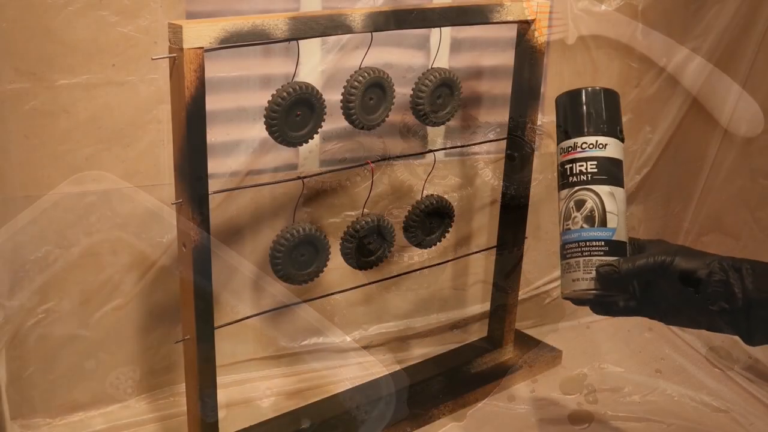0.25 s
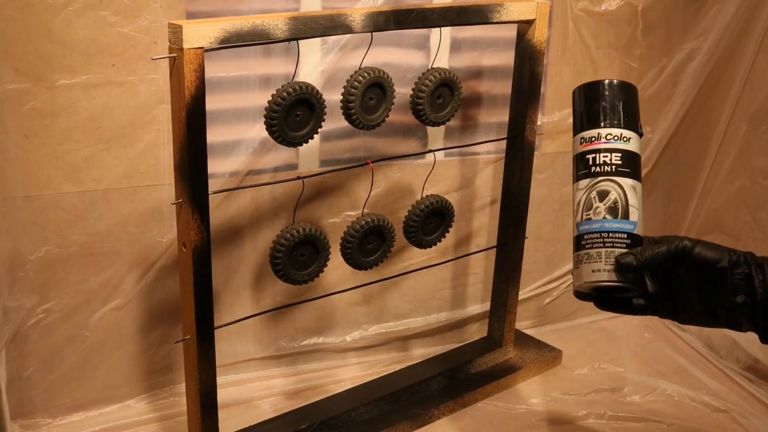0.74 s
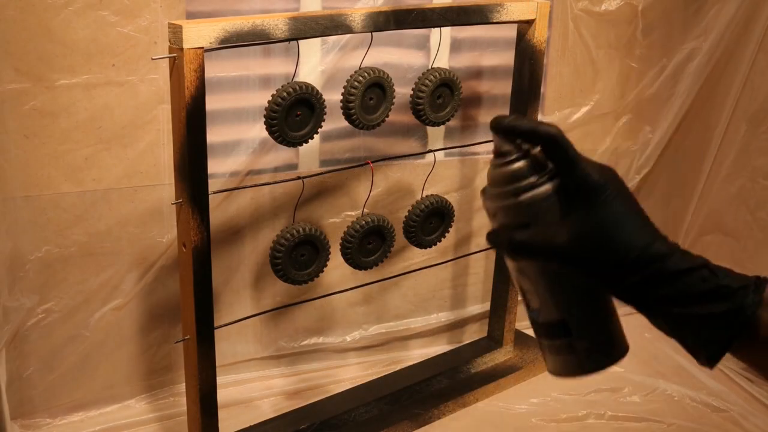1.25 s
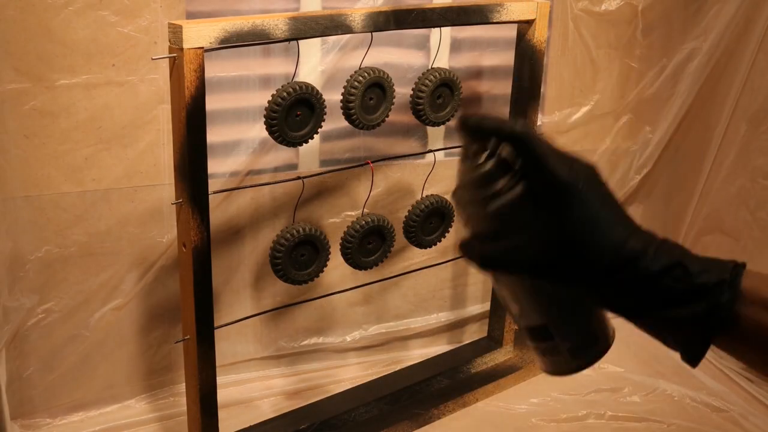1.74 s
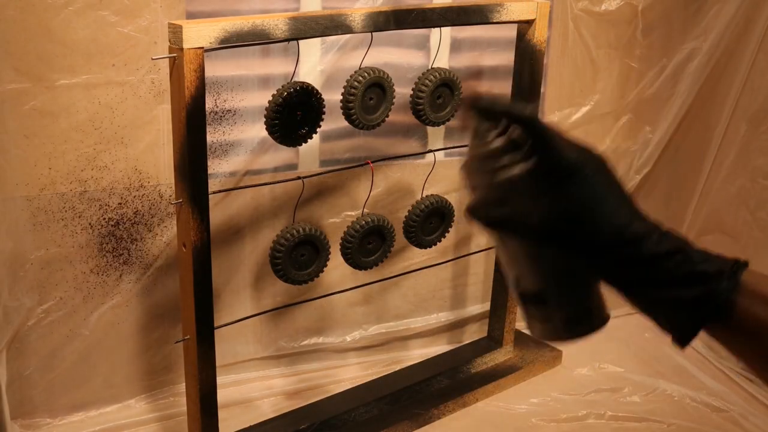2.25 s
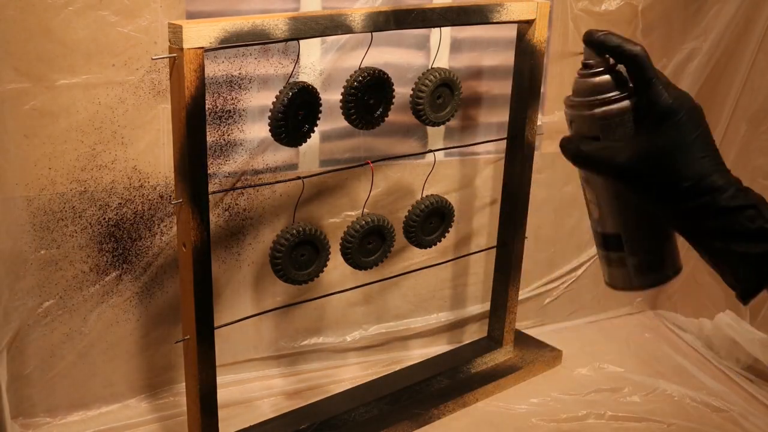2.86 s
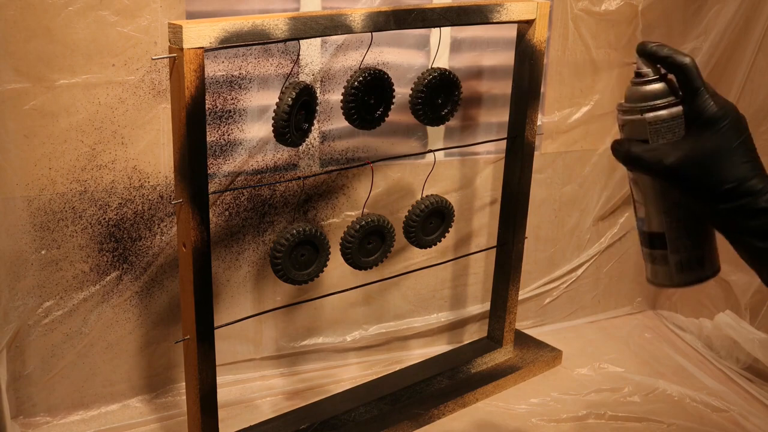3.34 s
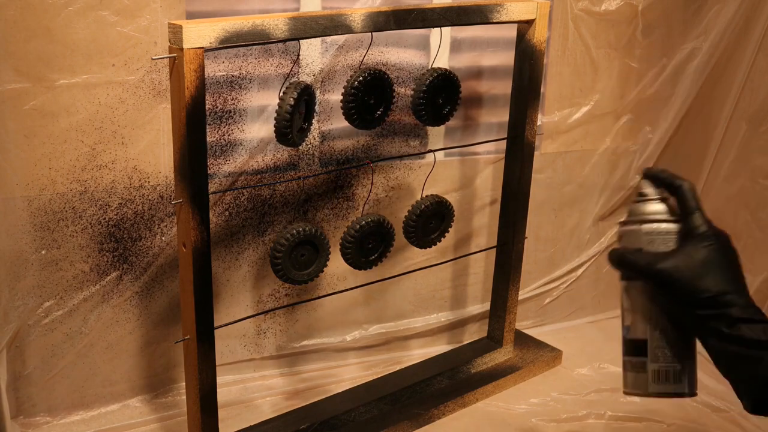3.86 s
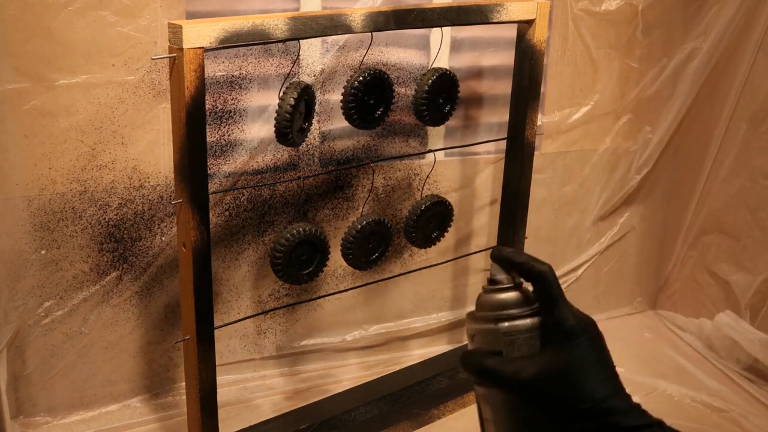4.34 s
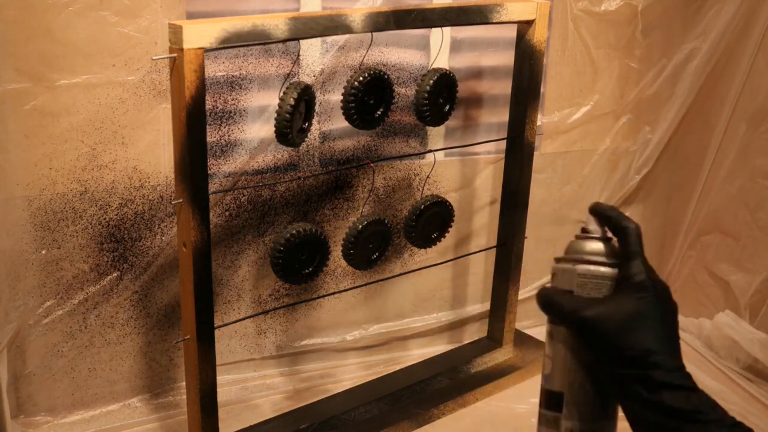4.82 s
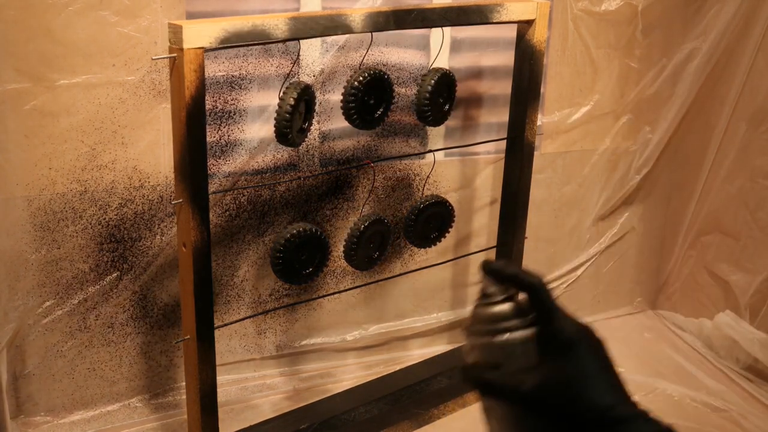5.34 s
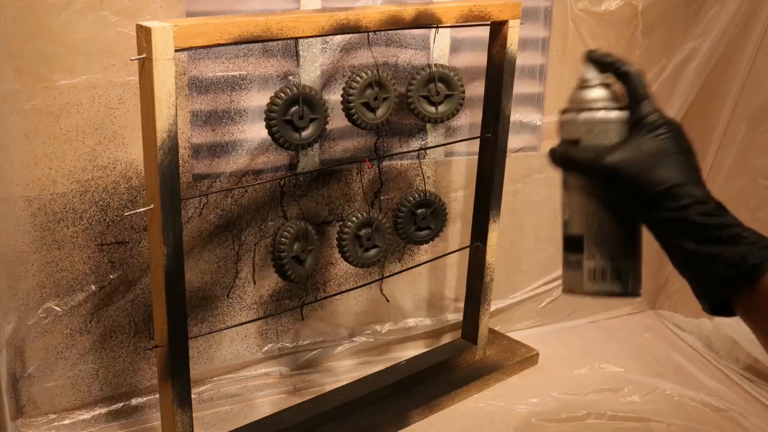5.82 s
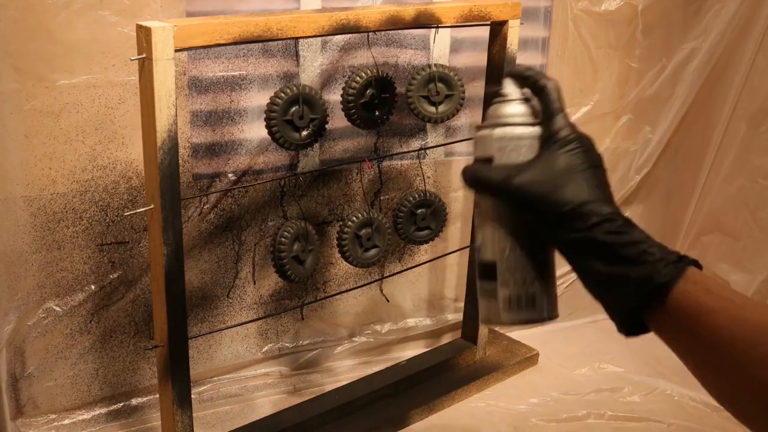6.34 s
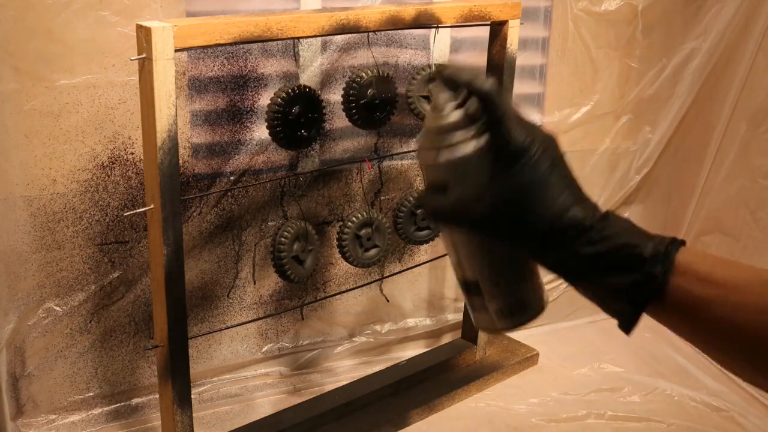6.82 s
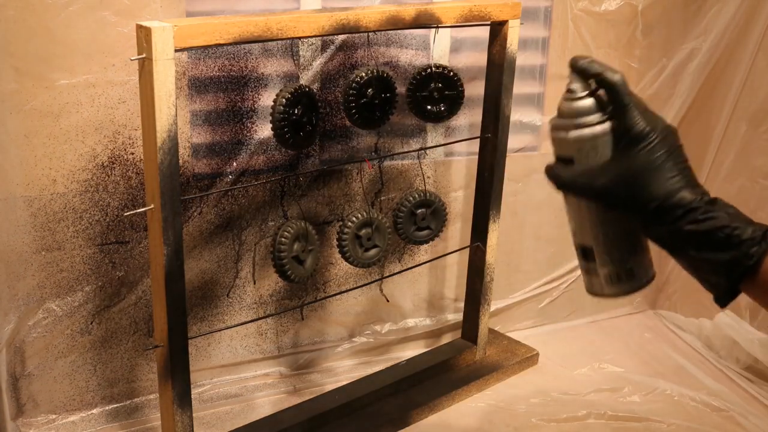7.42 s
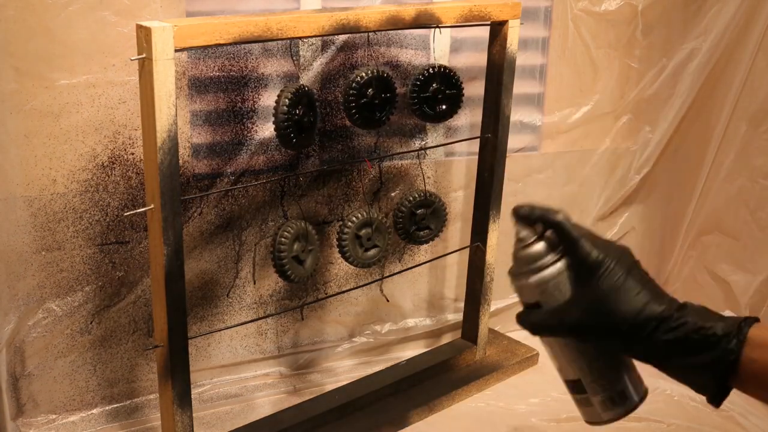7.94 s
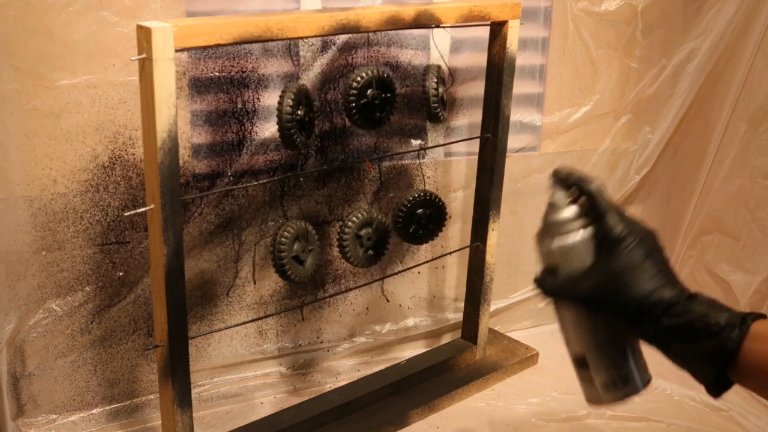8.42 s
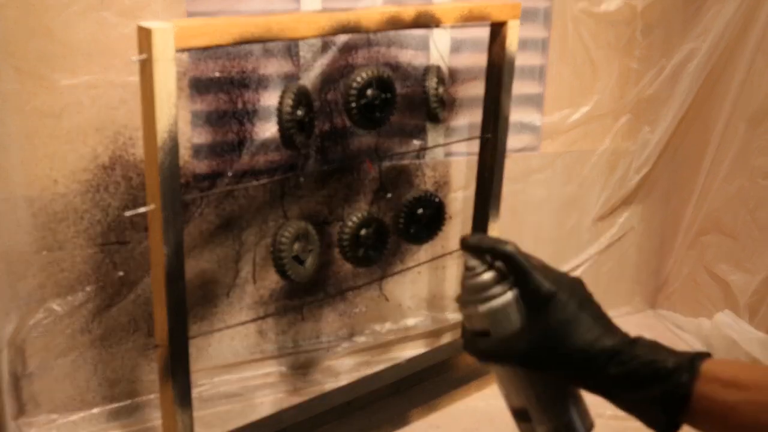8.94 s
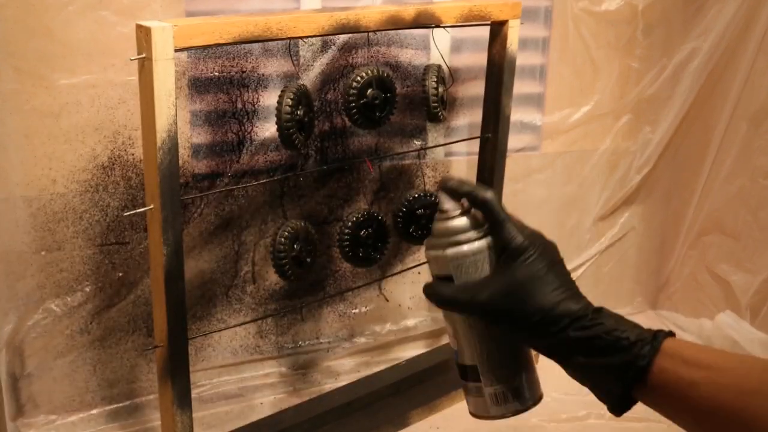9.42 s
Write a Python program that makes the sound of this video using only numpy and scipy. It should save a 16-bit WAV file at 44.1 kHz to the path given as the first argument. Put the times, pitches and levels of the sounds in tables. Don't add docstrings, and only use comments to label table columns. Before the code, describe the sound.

After brief silence, a gloved hand settles on a spray can, its mixing ball rattles sharply, then paint hisses in long bursts over continued clacking.

```python
import sys
import numpy as np
from scipy import signal
from scipy.fft import rfft, irfft, next_fast_len
from scipy.io import wavfile
from scipy.ndimage import uniform_filter1d, minimum_filter1d, map_coordinates

SR = 44100
rng = np.random.default_rng(int(sys.argv[2]) if len(sys.argv) > 2 else 0)


def dump(signal):
    limited = np.clip(np.atleast_2d(signal).T, -1, 1)
    pcm = np.round(limited * 32767).astype(np.int16)
    wavfile.write(sys.argv[1], SR, pcm)


def elevation(decibels):
    levels = np.asarray(decibels, float)
    return 10 ** (levels / 20)


N = 426447
START_S = 0.706

# (time [s], low thump [dB], glove creak [dB])
SETTLE = [
    (0.725, -49, -66),
    (0.84, -70, -70),
    (0.92, -48.5, -60.5),
    (0.992, -75, -80),
    (1.068, -58, -102),
]
THUMP_S, CREAK_S, CREAK_REST_DB = 0.056, 0.011, -89
# (frequency [Hz], level [dB])
THUMP = [(40, -32), (65, 0), (80, 2), (97, -6), (160, -48)]
# (frequency [Hz], level [dB])
CREAK = [(2600, -38), (3050, -6), (3350, 4), (3700, -12), (4200, -18), (8000, -20), (9500, -56)]
# (frequency [Hz], density [dB per Hz])
AIR = [(15, -33), (25, -7), (112, 0.5), (219, -9), (500, -16), (569, -17), (756, -17), (3300, -29.5),
       (3950, -33.5), (12000, -60), (15600, -96), (22000, -120)]
AIR_DB, DULL_HZ = -65.5, 9100
# (frequency [Hz], left-right likeness [0-1])
AIR_ALIKE = [(100, 1), (300, 0.2), (1500, 0.42), (5000, 0.053)]
# (time [s], hum level [dB])
FAN = [
    (1.05, -66),
    (1.14, -61),
    (3.57, -60),
    (3.86, -65),
    (8.88, -63.5),
    (9.11, -79),
    (9.67, -68),
]
# (frequency [Hz], level [dB])
HUM = [(30, -57), (60, -11), (90, -3.5), (117, -8.5), (135, -1), (180, -29), (400, -32), (1200, -52)]
# (frequency [Hz], level against the hum [dB])
MOTOR = [(118.4, -3), (108.4, -10)]

# (time [s], peak [dB], loudest wall note [Hz], brightness [dB], low body [dB])
CRACKS = [(1.0873, -14.5, 4370, -2, -10), (1.1153, -14, 1980, -8, 1), (1.1546, -20.5, 3500, -1, 0),
          (1.1984, -22, 3900, 1, 0), (1.617, -17, 3150, -5, 1), (1.8553, -15, 3850, 0.5, 2),
          (2.1303, -13.5, 2020, -8.5, -4.5), (2.8594, -12.5, 4500, -8.5, -6.5),
          (3.5972, -10.5, 2720, -6, 1.5), (3.8586, -9.5, 4020, -4.5, 1), (4.1634, -14, 3060, -4, 3),
          (5.6481, -20.5, 3520, -3, 9), (5.9091, -15, 3470, -9, -1.5), (6.2119, -14, 4240, -4.5, 3),
          (6.4051, -14, 4030, -8.5, -6), (6.6562, -16.5, 3290, -6, -5), (6.8005, -12.5, 2970, -7, -1),
          (6.8368, -16, 3130, -6.5, 1.5), (7.0271, -14.5, 3160, -5, 2), (7.147, -12, 1740, -11, -4),
          (7.2733, -15, 4000, -3.5, 0), (7.501, -13, 1810, -4, -4), (7.7545, -15, 2750, -8.5, -11),
          (7.899, -11.5, 2310, -3, 0.5), (8.0901, -15.5, 2180, -2.5, 1), (8.4888, -14, 3070, -6.5, -3.5),
          (8.9299, -15.5, 2100, -6.5, 1.5), (9.148, -14.5, 2350, -7.5, -8), (9.603, -22, 2000, -5.5, 5),
          (2.5904, -16.5, 2950, -7, 4), (5.0801, -15.5, 1800, 0, 5)]
# (time [s], peak [dB], note [Hz], brightness [dB], low body [dB])
KNOCKS = [(1.1761, -22, 2880, -11, 0), (1.2632, -14.5, 1610, -15, -2), (1.3001, -21, 2120, -18.5, -3),
          (1.603, -35, 2130, -9, 0), (1.635, -20.5, 2860, -12, -5), (1.6644, -24.5, 2170, -7.5, -3),
          (1.7928, -22.5, 2070, -11, 0), (1.82, -25, 2090, -15, -0.5), (2.5062, -15.5, 1705, -16, -9),
          (2.548, -25, 2180, -13, -1), (4.041, -27, 2700, -17, 4), (3.895, -23.5, 2610, -12, -6),
          (5.835, -34.5, 2170, -11.5, 1), (5.8933, -17.5, 1650, -15.5, -5), (5.9317, -23.5, 1700, -8.5, 4),
          (6.014, -12.5, 2340, -13, 4.5), (6.1145, -12, 1720, -14, -1), (6.2471, -18.5, 1840, -14.5, -5),
          (6.3647, -21.5, 1870, -13, -3), (6.4353, -23.5, 1380, -10, 0), (7.0556, -14, 2100, -10, -1),
          (7.2448, -17.5, 2320, -10.5, 6), (7.2904, -19.5, 1780, -13.5, -5), (7.4839, -16, 2200, -12, 0),
          (7.589, -14.5, 1500, -11, -2.5), (8.1529, -29, 1970, -9.5, 7), (8.5398, -20.5, 1950, -10.5, -2),
          (9.1965, -22, 2070, -15, -2), (9.5345, -16, 3950, -13.5, -6), (9.577, -22.5, 1450, -9, 5)]
# (time [s], peak [dB], note [Hz])
THUDS = [(2.2066, -31, 2520), (2.2277, -29.5, 2140), (2.885, -29, 2070), (2.9511, -33.5, 1710),
         (2.9737, -32.5, 2620), (3.6415, -27.5, 2880), (4.3081, -19, 2050), (4.328, -24, 1390),
         (4.355, -32, 1730), (5.2372, -26, 2020), (5.7357, -13.5, 1786), (5.787, -29, 1790),
         (6.3504, -23, 1760), (6.6884, -28, 1700), (7.423, -22.5, 2010), (7.5165, -27, 1930),
         (6.792, -27, 1800), (7.968, -24.5, 1865), (8.567, -28.5, 2660), (8.961, -21.5, 2170),
         (9.177, -22, 2250), (9.3109, -35, 1770), (9.6253, -27.5, 2300)]
# (time [s], peak [dB], note [Hz], brightness [dB])
TUMBLES = [(1.3264, -26.5, 1630, -12), (1.3814, -17, 3040, -7), (1.4664, -39, 2150, -6),
           (1.481, -32, 2570, -14), (1.564, -32.5, 3370, 0), (1.876, -21.5, 2150, -10),
           (1.897, -21.5, 2110, -11), (3.332, -18.5, 2830, -8), (3.361, -22.5, 2100, -3),
           (4.0064, -25, 1890, -17), (4.439, -21, 2700, -7), (4.6266, -19, 2160, -17.5),
           (4.7543, -19.5, 1810, -7.5), (5.4173, -19.5, 3040, -8), (5.4583, -23, 1830, 0),
           (6.1457, -26.5, 1700, -10), (6.4542, -27, 1650, -12), (7.65, -24, 1900, -11.5),
           (7.7809, -23, 1890, -13.5), (8.7199, -22.5, 4080, -10.5), (1.8496, -24.5, 1990, -14)]
# (time [s], peak [dB], note [Hz], brightness [dB])
ROLLS = [
    (2.314, -26, 3650, -5.5),
    (2.589, -24, 2860, -9),
    (3.0594, -28, 2900, -11),
    (3.216, -35, 3000, -40),
    (4.9274, -27.5, 2100, -16),
    (5.2521, -27, 2020, -48),
    (6.569, -28.5, 1530, -31),
]
# (time [s], peak [dB], note [Hz])
REBOUNDS = [(1.3992, -28, 2130), (1.4274, -36, 2030), (2.17, -30.5, 2250), (2.3402, -34, 3230),
            (2.5802, -22.5, 2980), (2.609, -19.5, 2830), (2.6322, -24, 1810), (2.815, -40, 2000),
            (3.075, -34, 2830), (3.0956, -34, 2650), (3.1111, -35, 1680), (3.2316, -30.5, 2440),
            (3.3512, -31, 1800), (3.4117, -38, 2380), (3.6207, -26, 2940), (3.699, -31, 1610),
            (3.9147, -29, 2960), (4.0252, -25, 2820), (4.1873, -27.5, 1900), (4.343, -26, 1490),
            (4.457, -27.5, 1620), (4.4854, -30, 3470), (4.502, -33.5, 2940), (4.6437, -22, 1930),
            (4.6692, -26, 2280), (4.7774, -27, 3020), (4.804, -35, 1480), (5.099, -26.5, 1840),
            (5.1185, -30, 1750), (5.145, -33.5, 3860), (5.2698, -28, 1570), (5.4361, -24, 4080),
            (5.4698, -30, 2990), (2.329, -37, 2500), (6.4662, -31.5, 1700), (6.583, -23, 1850),
            (6.594, -29, 1660), (6.6116, -41, 1970), (6.675, -26.5, 1760), (7.3678, -41, 2820),
            (7.6642, -27, 1260), (7.796, -28.5, 2100), (7.9244, -35, 1770), (7.9852, -31.5, 1720),
            (8.066, -34, 2270), (8.7405, -30.5, 2695), (8.7623, -31, 2280), (8.972, -30, 1750),
            (9.2114, -31, 2130)]
THUD_DB, REBOUND_DB = -17.5, -13
HOPS_DB, HOPS_FOLLOW = -18, 0.14
TUMBLE_DB, ROLL_DB = -5.5, 29
# (frequency [Hz], level [dB])
WALL = [(120, -56), (200, -13), (249, -26.5), (665, -19.5), (842, -11.5), (1110, -13), (1810, -3.5),
        (3480, -4), (4180, -5), (11600, -17.5), (15500, -32)]
# (frequency [Hz], t60 [s])
RING = [(300, 0.13), (1000, 0.073), (1750, 0.058), (2500, 0.049), (5500, 0.042), (12000, 0.035)]
# (frequency [Hz], relative width, lift [dB])
SHELL = [(6860, 0.088, 4), (10860, 0.14, 5.5)]
BODY_HZ = 1450
SOFT_S, SOFT_PER_DB, CRACK_PER_DB = 0.00017, 0.65, 0.83
NOTE_DB, NOTE_T60_S = -10.5, 0.022
SNAP_DB, SNAP_HZ, SNAP_S = -4.5, 3900, 0.00029
# (frequency [Hz], left minus right [dB])
CAN_LEAN = [(200, 1.5), (600, -0.5), (1500, -1.5), (3000, -2.5), (6000, -1), (10000, -0.5)]
# (frequency [Hz], t60 [s])
BOOTH = [(300, 0.1), (2000, 0.17), (10000, 0.13)]

# (time [s], level [dB], length [s])
SWINGS = [(1.32, -47, 0.36), (1.494, -50.5, 0.063), (1.554, -56, 0.034), (1.605, -45, 0.097),
          (1.73, -58.5, 0.035), (1.782, -53, .02), (1.864, -37.5, 0.27), (2.29, -40.5, 0.11),
          (2.576, -38, 0.076), (2.68, -39.5, 0.22), (3.033, -45.5, 0.084), (3.205, -47, 0.065),
          (3.287, -42.5, 0.58), (3.56, -48, 0.32), (4.008, -40.5, 0.21), (4.324, -40.5, 0.084),
          (4.434, -39.5, 0.084), (4.626, -43.5, 0.21), (4.925, -45, 0.19), (5.265, -45, 0.1),
          (5.39, -47.5, 0.18), (5.08, -39, 0.041), (5.735, -58, .01), (5.748, -58, 0.32), (5.87, -54, .03),
          (6.032, -53, 0.063), (6.111, -48, 0.063), (6.226, -40.5, 0.07), (6.37, -48, 0.14),
          (6.575, -45.5, 0.15), (6.81, -56, 0.071), (7.053, -47, 0.27), (7.504, -39, 0.02),
          (7.633, -44.5, 0.37), (7.994, -47.5, 0.2), (8.23, -45, 0.46), (8.723, -43, 0.39),
          (9.154, -41, 0.62)]
RISE_S, SAG_DB_PER_S, SETTLE_S, STIR_DB = 0.029, 1.5, 0.011, -71
# (frequency [Hz], level [dB])
SLOSH = [(300, -25.5), (800, -16.5), (1300, -12), (1900, -6), (2800, -9.5), (3600, -11.5), (5000, -14.5),
         (10000, -20.5), (14000, -29)]

# (time [s], length [s], first pitch [Hz], last pitch [Hz], level [dB])
SKIDS = [(1.329, 0.033, 1745, 2010, -47), (1.487, 0.055, 2500, 2730, -53), (1.502, 0.031, 1620, 1640, -54),
         (1.552, 0.037, 2990, 3280, -48), (1.555, .03, 3500, 3600, -51), (1.604, 0.014, 2050, 2160, -54),
         (2.733, 0.023, 2200, 1840, -50), (3.763, 0.1, 1850, 1950, -52), (3.893, 0.016, 2800, 2780, -39),
         (7.067, 0.024, 1360, 1300, -48), (7.157, .035, 1800, 1780, -45), (7.296, 0.019, 1790, 1780, -44),
         (4.025, 0.037, 2750, 2630, -49), (4.084, 0.036, 2160, 2020, -53), (8.75, 0.042, 2250, 2260, -51),
         (9.276, 0.044, 1800, 1770, -53)]
SKID_EDGE_S, SKID_WAVER_HZ, SKID_ROUGH_DB = 0.0076, 68.7, 4

# (start [s], end [s], level [dB], drift [dB per s], lower edge of bright band [Hz])
LEAKS = [
    (1.916, 1.976, -57.5, 40, 7500),
    (6.21, 6.296, -46, -7, 7500),
    (7.894, 8.15, -59, -31, 8100),
]
# (start [s], end [s], level [dB], drift [dB per s], lower edge of bright band [Hz])
PRESSES = [
    (1.96, 5.545, -39.5, 2.5, 9140),
    (6.283, 7.908, -40, -9, 8750),
    (8.13, 9.7, -37, 4.5, 8740),
]
OPEN_S, CLOSE_S = 0.039, 0.0032
FRESH_DB, FRESH_S = -0.5, 0.24
# (time [s], gain [dB], edge shift [Hz])
AIM = [(2.1, 11, 1200), (2.2, 8, 900), (3.6, 5, -100), (3.92, 0.5, -300), (4.14, 3, 0), (4.31, -0.5, -300),
       (4.42, 2, -200), (5.12, 1.5, 350), (6.36, -2.5, -800), (6.51, -6, 0), (6.61, 1.5, 400),
       (6.78, -3, 500), (6.9, 6.5, 0), (7.07, 2, -600), (7.47, 8, -2), (7.87, 5.5, 0), (8.2, 3.5, -600),
       (8.7, -2, 100)]
# (frequency [Hz], density [dB per Hz])
NOZZLE = [(300, -29.5), (800, -28), (1800, -21), (3500, -16.5), (5000, -16.5), (8000, -12.5), (10000, -13),
          (11300, -12), (12400, -16), (14000, -22), (15700, -21)]
# (frequency [Hz], left-right likeness [0-1])
JET_ALIKE = [(300, 1), (1400, 0.68), (3000, 0.089), (7000, 0.12), (9500, 0.64), (15000, 0.25)]

# (frequency [Hz], level [dB])
CAPSULE = [(7500, -1), (9500, -1), (11200, 1), (13000, -2), (15700, -8)]
# (frequency [Hz], quiet limit [dB], limit under the loudest line [dB],
# mid limit against the local mid level [dB], side limit against the local mid level [dB])
THIN = [(3500, -130, -75, -45, -60), (4870, -130, -74, -30, -46), (8800, -118, -60, -20, -35),
        (9240, -116, -55, -19, 5), (12300, -112, -50, -15, 6), (13300, -110, -48, -4, 7),
        (14200, -96, -36, -11, 7), (15400, -92, -21, -6, 20)]
STREAK_DB, STREAK_HZ, STREAK_RARE = 7, 9400, 2.1

FIRST_CRACK_S = CRACKS[0][0]
now = np.arange(N) / SR


def unit(x):
    return x / np.sqrt(np.mean(x ** 2) + 1e-20)


def along(points, hz):
    f, v = np.transpose(points)
    return np.interp(np.log(hz + 1), np.log(f + 1), v)


def wobble(rate):
    knots = rng.standard_normal(int(N * rate / SR) + 4)
    return map_coordinates(knots, [np.arange(N) * rate / SR])


def filtered(x, response):
    m = next_fast_len(N + 8192)
    return irfft(rfft(x, m) * response(np.fft.rfftfreq(m, 1 / SR)), m)[..., :N]


def gate(start, end, rise, fall):
    shape = np.zeros(N)
    span = slice(int(start * SR), int((end + 12 * fall) * SR))
    t = np.arange(N)[span] / SR
    shape[span] = np.clip((t - start) / rise, 0, 1) ** 2 * np.exp(-np.clip(t - end, 0, 1) / fall)
    return shape


def half_turn(alike, hz):
    return np.arccos(np.clip(along(alike, hz), -1, 1)) / 2


def rush(spectrum, alike, patchy_db):
    z = signal.stft(rng.standard_normal((2, N)), nperseg=512)[2]
    field = uniform_filter1d(rng.standard_normal(z.shape[1:]), size=6, axis=0)
    field = uniform_filter1d(field, size=8, axis=1)
    pair = signal.istft(z * elevation(patchy_db * unit(field)), nperseg=512)[1][:, :N]

    def colour(hz):
        angle = half_turn(alike, hz)
        return elevation(along(spectrum, hz)) * [np.cos(angle), np.sin(angle)]

    mid, side = filtered(pair, colour)
    return unit(np.array([mid + side, mid - side]))


def settling():
    thump = sum(elevation(db) * np.exp(-abs(now - s) / THUMP_S) for s, db, _ in SETTLE)
    creak = sum(elevation(db) * np.exp(-abs(now - s) / CREAK_S) for s, _, db in SETTLE)
    creak = creak + elevation(CREAK_REST_DB) * (now < FIRST_CRACK_S)
    hand = thump * elevation(-3.5) * rush(THUMP, AIR_ALIKE, patchy_db=0.0)
    return hand + creak * elevation(1.0 + 2.4 * wobble(130)) * rush(CREAK, AIR_ALIKE, patchy_db=1.2)


def booth_air():
    still = filtered(rush(AIR, AIR_ALIKE, patchy_db=-0.5), lambda hz: hz / (hz + 150))
    return elevation(AIR_DB + 2.5) * unit(still)


def fan():
    s, level_db = np.transpose(FAN)
    hum_db = np.interp(now, np.r_[s[0] - 0.013, s], np.r_[-110, level_db])
    tones = 0
    for hz, db in MOTOR:
        phase = 2 * np.pi * np.cumsum(hz + 2 * wobble(3.3)) / SR
        tones = tones + elevation(db + 2.3 * wobble(3)) * np.sin(phase)
    rumble = elevation(-1.5) * rush(HUM, AIR_ALIKE, patchy_db=1.2)
    return elevation(hum_db) * (rumble + np.sqrt(2) * tones)


def background():
    bed = fan() + settling() + booth_air()
    dull = filtered(bed, lambda hz: 1 / (1 + (hz / DULL_HZ) ** 30))
    return np.where(now < FIRST_CRACK_S, dull, bed)


def contacts():
    blows = CRACKS + KNOCKS + [(*thud, THUD_DB, 0) for thud in THUDS]
    every = [(*row, HOPS_DB - (1 - HOPS_FOLLOW) * (row[1] + 28.0)) for row in blows]
    every += [(*row, 0, TUMBLE_DB) for row in TUMBLES]
    every += [(*row, 0, ROLL_DB) for row in ROLLS]
    return every + [(*row, REBOUND_DB, 0, HOPS_DB) for row in REBOUNDS]


def wall_colour(f, centre_hz, bright_db, body_db, detune):
    note_lift_db = np.clip(6 - 4.5 * np.log2(centre_hz / 1800), 0, 9)
    colour_db = along(WALL, f) + note_lift_db * np.exp(-(np.log(f / centre_hz) / 0.13) ** 2)
    colour_db += body_db / (1 + (f / BODY_HZ) ** 4)
    colour_db += (bright_db + 7.5) * np.clip(np.log2(f / 3000) / 0.23, 0, 1)
    for peak_hz, width, lift_db in SHELL:
        colour_db += lift_db * np.exp(-(np.log(f / peak_hz) / width - 0.5 * detune) ** 2)
    clumps = uniform_filter1d(rng.standard_normal(len(f)), size=9)
    return colour_db + 2.6 * unit(clumps)


def note_and_snap(t, centre_hz, bright_db, note_luck, snap_luck, pitch_luck):
    note_db = NOTE_DB - 0.56 * (max(bright_db, -20) + 10) - 1.6 * max(np.log2(centre_hz / 1900), 0)
    note = elevation(note_db + 4.4 * note_luck - 60 * t / NOTE_T60_S) * np.sin(2 * np.pi * centre_hz * t)
    note *= 1 - np.exp(-t / 0.0006)
    snap = elevation(min(SNAP_DB + bright_db, 2.5) + 2.5 * snap_luck) * np.exp(-(t / SNAP_S - 2) ** 2)
    return note + snap * np.sin(2 * np.pi * SNAP_HZ * np.exp(0.13 * pitch_luck) * t)


def knocks(count=20):
    out = np.zeros((2, N + SR))
    t = np.arange(4096) / SR
    f = np.fft.rfftfreq(len(t), 1 / SR) + 1
    hz = np.geomspace(250, 15000, count)
    bands = np.clip(1 - abs(np.log(f / hz[:, None])) / np.log(hz[1] / hz[0]), 0, 1)
    angle = half_turn(JET_ALIKE, f)
    lasting = 1 / (1 + (t / 0.079) ** 8)
    for s, db, centre_hz, bright_db, body_db, hops_db in contacts():
        mid, side = rfft(rng.standard_normal((2, len(t))))
        ring_luck, level_luck = rng.standard_normal((2, count))
        colour_db = wall_colour(f, centre_hz, bright_db, body_db, ring_luck[1])
        sides = elevation(colour_db) * (np.cos(angle) * mid + np.array([[1], [-1]]) * np.sin(angle) * side)
        t60 = (along(RING, hz) * np.exp(0.11 * ring_luck))[:, None]
        fall = elevation(1.8 * level_luck[:, None] - 60 * t / t60)
        fall += elevation(5 + CRACK_PER_DB * (bright_db + 7) - 60 * t / 0.0026) * (hz[:, None] > 1600)
        since_hop = (t / (0.017 * np.exp(0.021 * ring_luck[0])) + level_luck[0]) % 1
        fall += lasting * elevation(hops_db - 4.1 * since_hop - 60 * t / (7 * t60))
        blow = (irfft(sides[:, None] * bands, len(t)) * fall).sum(axis=1)
        rise_s = SOFT_S * elevation(-SOFT_PER_DB * np.clip(bright_db + 4, -20, 0))
        blow *= 1 - np.exp(-t / rise_s)
        tone = note_and_snap(t, centre_hz, bright_db, level_luck[1], level_luck[2], ring_luck[2])
        out[:, round(s * SR):][:, :len(t)] += elevation(db + 1.0) * (blow / abs(blow).max() + tone)
    return out[:, :N]


def booth(x):
    hz, t, z = signal.stft(rng.standard_normal((2, SR // 3)), SR, nperseg=256)
    tail = signal.istft(z * elevation(-60 * t / along(BOOTH, hz)[:, None]), SR, nperseg=256)[1]
    late = np.pad(x.mean(axis=0), (130, 0))[None]
    return signal.fftconvolve(late, tail / np.linalg.norm(tail[0]), axes=1)[:, :N]


def slide():
    grains = elevation(2.2 * wobble(55) + 2.5 * wobble(400))
    motion = elevation(STIR_DB) * gate(FIRST_CRACK_S, 10, RISE_S, 1)
    for s, db, length in SWINGS:
        sagging = elevation(db - SAG_DB_PER_S * np.clip(now - s, 0, 1))
        motion += sagging * gate(s - RISE_S, s + length, RISE_S, SETTLE_S)
    return elevation(-4.5) * motion * unit(grains * rush(SLOSH, AIR_ALIKE, patchy_db=2.5))


def skids():
    waver_hz = SKID_WAVER_HZ * wobble(150)
    rough = elevation(SKID_ROUGH_DB * wobble(120))
    out = np.zeros(N)
    for s, length, first_hz, last_hz, db in SKIDS:
        glide_hz = np.interp(now, [s, s + length], [first_hz, last_hz]) + waver_hz
        sing = np.sin(2 * np.pi * np.cumsum(glide_hz) / SR)
        out += elevation(db + 2.5) * gate(s - SKID_EDGE_S, s + length, SKID_EDGE_S, SKID_EDGE_S) * sing
    return rough * out


def jet():
    sputter = elevation(1.0 * wobble(25) + 1.0 * wobble(300) + 0.92 * wobble(5))
    hz, t, z = signal.stft(sputter * rush(NOZZLE, JET_ALIKE, patchy_db=1.5), SR, nperseg=512)
    s, turn_db, shift_hz = np.transpose(AIM)
    gain, edge_hz = np.full(N, 1e-7), np.zeros(N)
    for start, end, db, drift, press_edge_hz in LEAKS + PRESSES:
        fresh_db = FRESH_DB * np.exp(-abs(now - start) / FRESH_S)
        drift_db = drift * np.clip(now - (start + end) / 2, -2, 2)
        gain += elevation(db + drift_db + fresh_db) * gate(start, end, OPEN_S, CLOSE_S)
        spraying = (now >= start) & (now < end)
        edge_hz = np.where(spraying, press_edge_hz + np.interp(now, s, shift_hz), edge_hz)
    gain *= elevation(np.interp(now, s, turn_db))
    level_db = np.interp(t, now, 20 * np.log10(gain))
    edge_hz = np.clip(np.interp(t, now, edge_hz), 7500, 11000)
    lift_db = 10.0 + 0.3 * (np.maximum(level_db, -68) + 34.0)
    lift = elevation(lift_db / (1 + (edge_hz / (hz[:, None] + 1)) ** 36) - lift_db)
    flow = signal.istft(z * lift, SR, nperseg=512)[1][:, :N]
    return elevation(3.5) * gain * unit(flow)


def scene():
    ball = knocks()
    can = elevation([[-0.6], [0.6]]) * ball + elevation(-9.5) * booth(ball) + slide()
    lean = lambda hz: elevation(along(CAN_LEAN, hz) * np.array([[0.5], [-0.5]]))
    return filtered(can + jet(), lean) + background() + elevation([[-1.6], [1.6]]) * skids()


def thin_treble(x):
    mid_side = np.array([x[0] + x[1], x[0] - x[1]]) / 2
    hz, t, z = signal.stft(mid_side, SR, nperseg=1024)
    bins, frames = len(hz), len(t)
    thin_hz, *limits = np.transpose(THIN)
    quiet_db, masked_db, mid_db, side_db = (np.interp(hz, thin_hz, c)[:, None] for c in limits)
    power = uniform_filter1d(abs(z[0]) ** 2, size=17, axis=0)
    local = np.sqrt(abs(uniform_filter1d(power, size=3, axis=1)))
    local = minimum_filter1d(local, size=5, axis=1)
    tiles = rng.standard_normal((2, bins // 16 + 1, frames // 3 + 1))
    luck = np.repeat(np.repeat(tiles, 16, axis=1), 3, axis=2)[:, :bins, :frames]
    apart_db = np.array([0, -7])[:, None, None] * tiles[1, 0].repeat(3)[:frames]
    luck_db = np.clip(hz[:, None] / 3000 - 2, 0.3, 1) * 9.8 * luck
    limit = local * elevation(np.array([mid_db, side_db]) + luck_db + apart_db)
    top_hz = 15750 - 350 * np.floor(np.clip(1 + 1.5 * tiles[0, 0].repeat(3)[:frames], 0, 4))
    floor = np.maximum(elevation(quiet_db), local.max(axis=0) * elevation(masked_db))
    kept = (abs(z) > np.maximum(limit, floor * elevation(3 * luck))) & (hz[:, None] < top_hz)
    lines = rng.standard_normal((bins // 4 + 1, frames // 3 + 1))
    lines = lines.repeat(4, axis=0).repeat(3, axis=1)[:bins, :frames]
    streaks = elevation(STREAK_DB * (lines > STREAK_RARE) * (hz[:, None] > STREAK_HZ))
    mid, side = signal.istft(z * kept * streaks, SR, nperseg=1024)[1][:, :N]
    return np.array([mid + side, mid - side])


def band_limit(x):
    return signal.sosfilt(signal.butter(12, 15750, fs=SR, output="sos"), x)


def record(dry):
    def microphones(hz):
        delay_s = np.array([[0.5], [-0.5]]) * 5e-5 / (1 + (hz / 8500) ** 8)
        return np.exp(-2j * np.pi * hz * delay_s) * elevation(along(CAPSULE, hz))

    switched_on = np.clip((now - START_S) / 0.0038, 0, 1)
    mix = switched_on * thin_treble(filtered(dry, microphones))
    return band_limit(mix)


dry = scene()
out = record(dry)
dump(out)
```